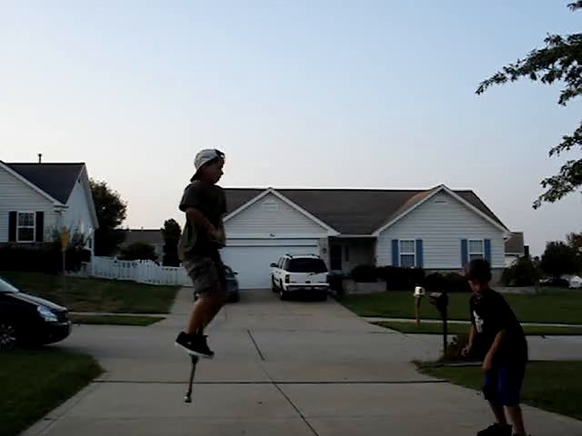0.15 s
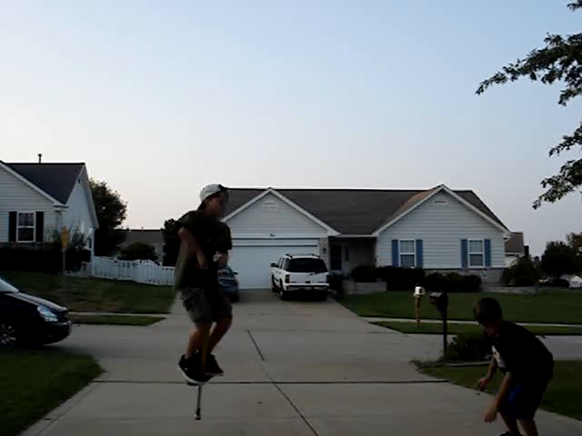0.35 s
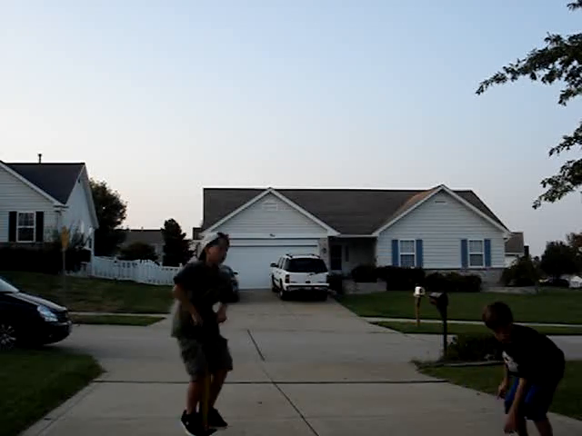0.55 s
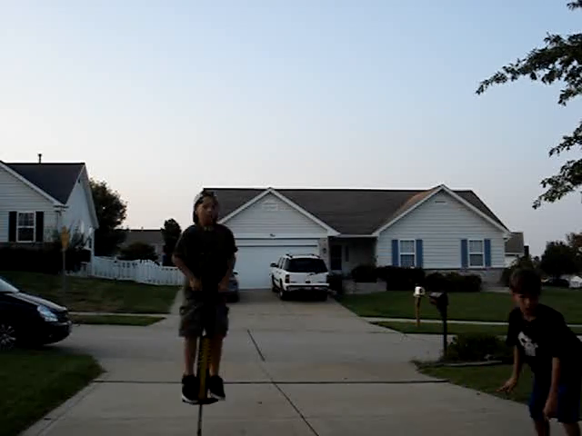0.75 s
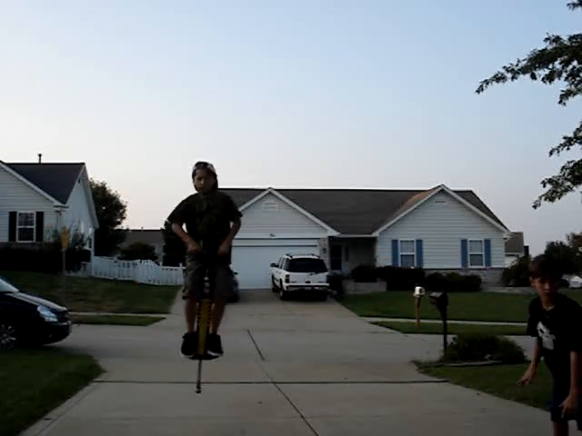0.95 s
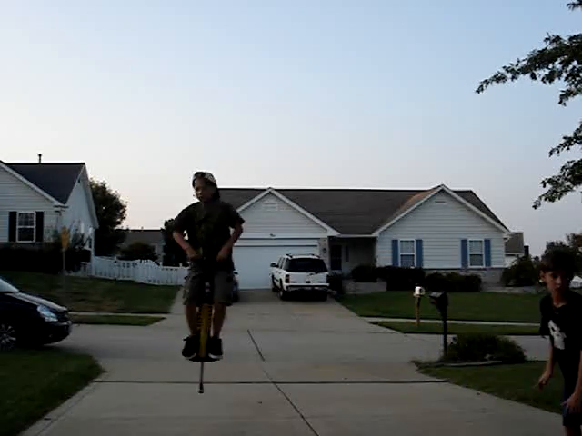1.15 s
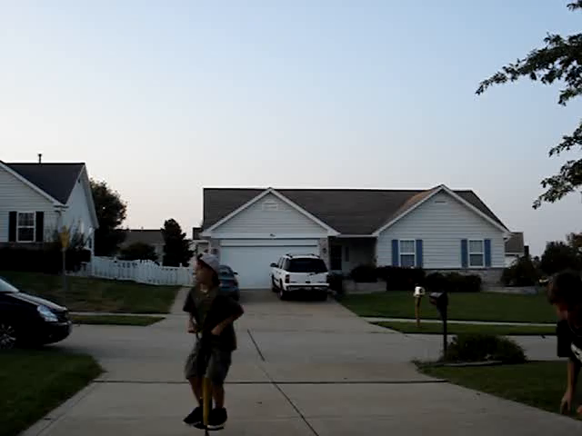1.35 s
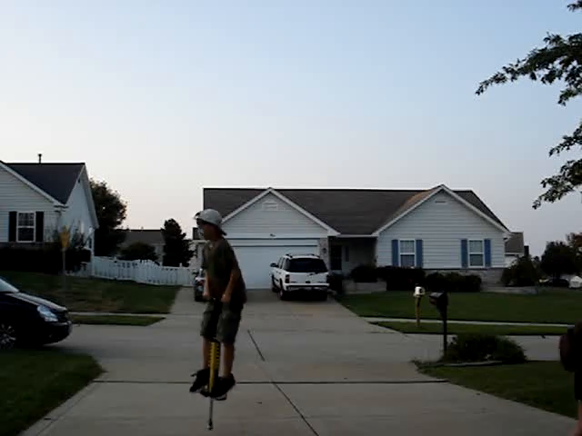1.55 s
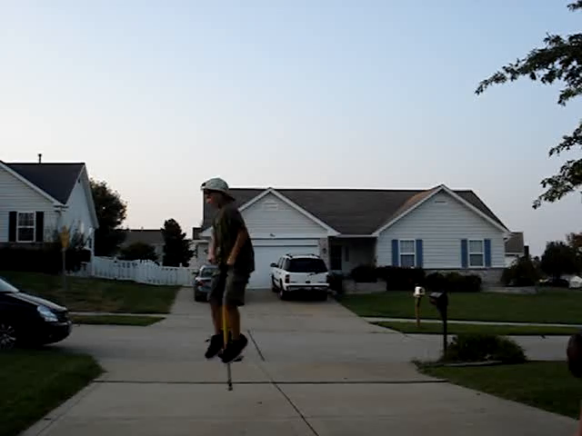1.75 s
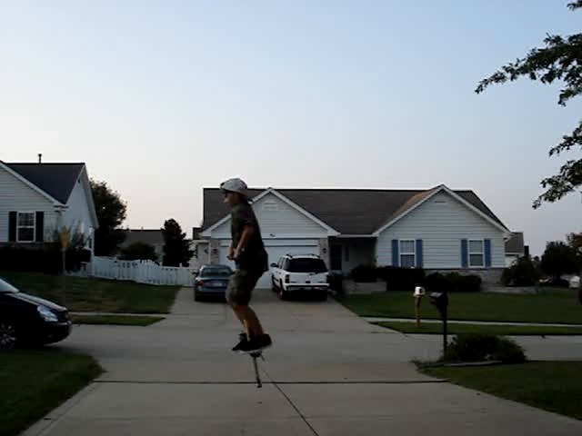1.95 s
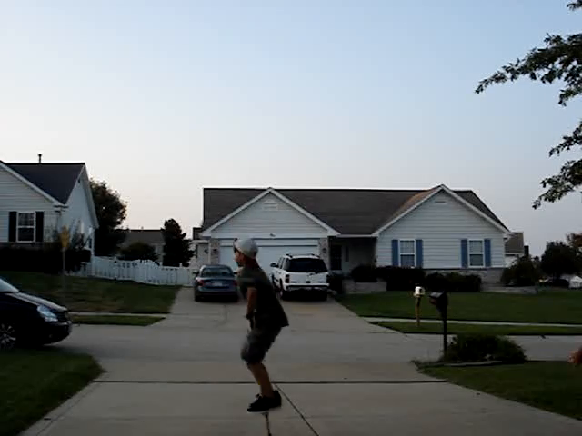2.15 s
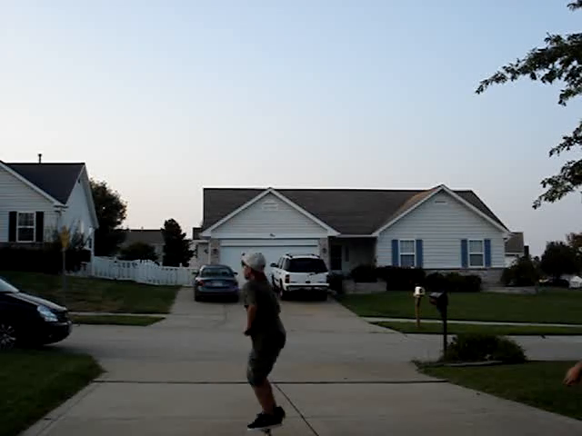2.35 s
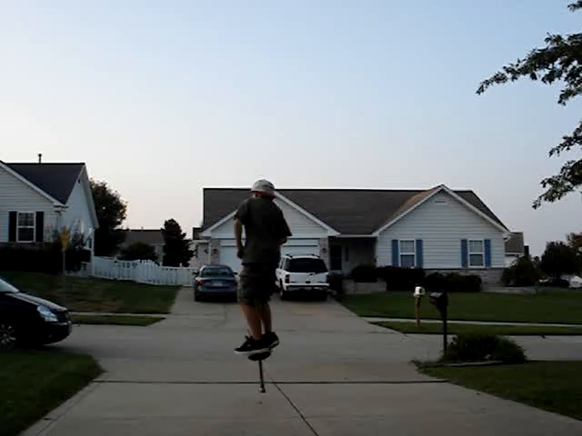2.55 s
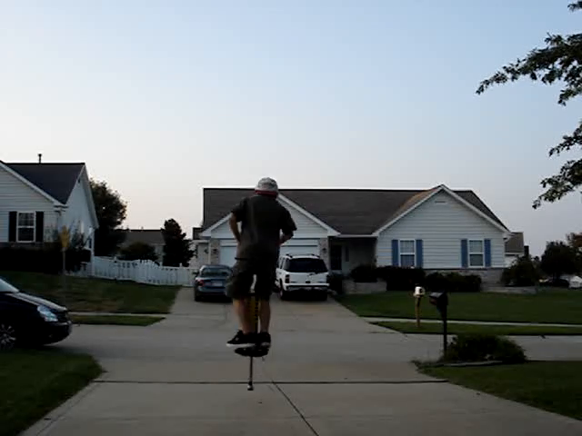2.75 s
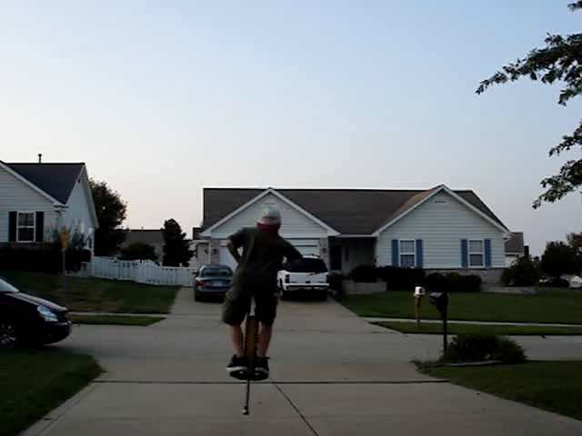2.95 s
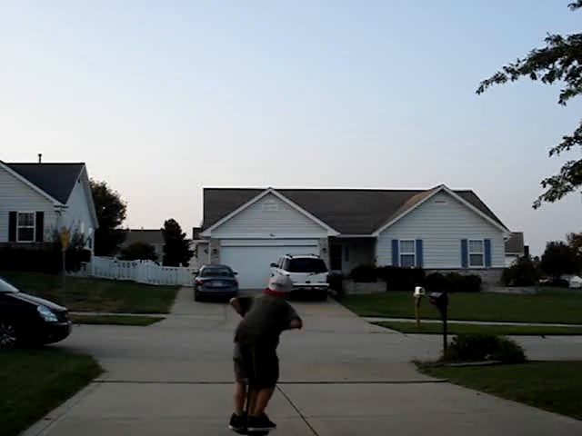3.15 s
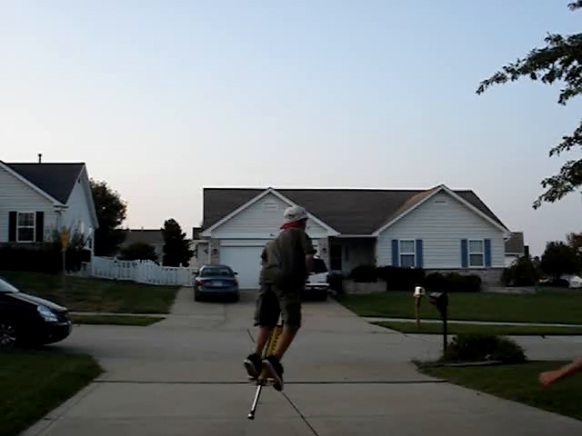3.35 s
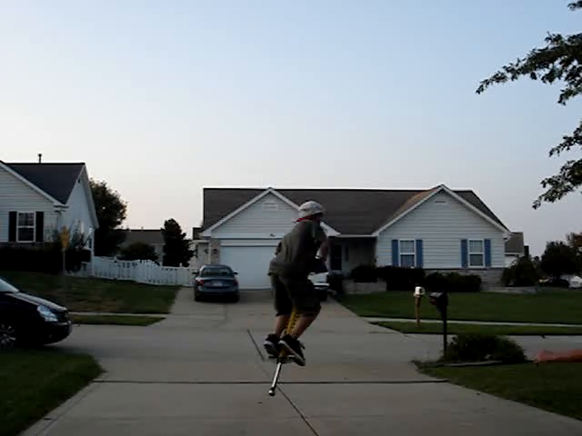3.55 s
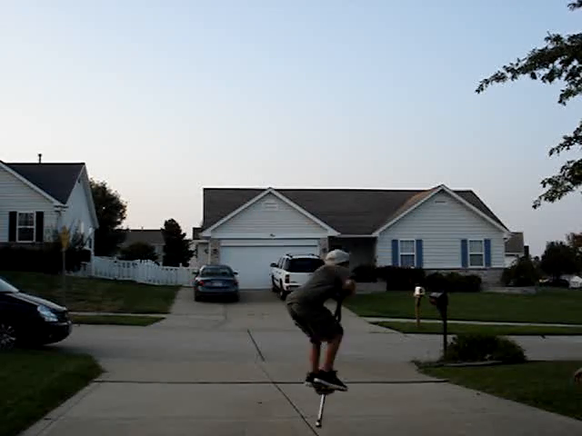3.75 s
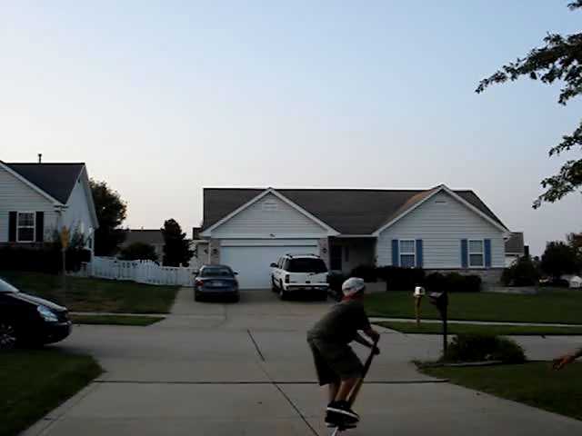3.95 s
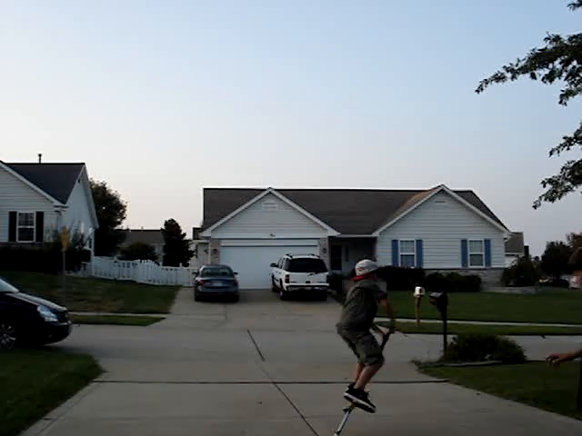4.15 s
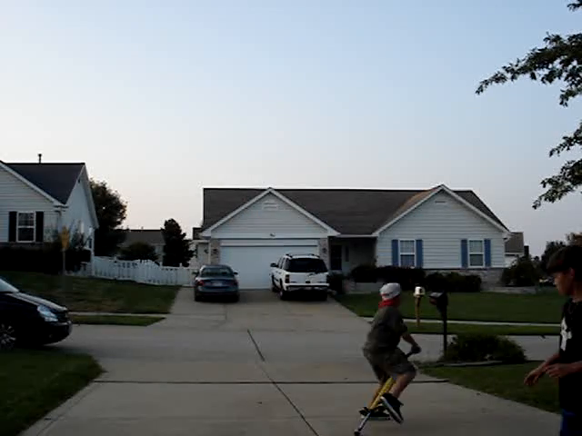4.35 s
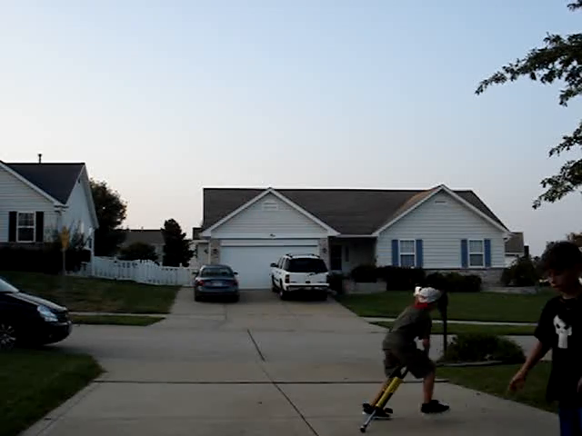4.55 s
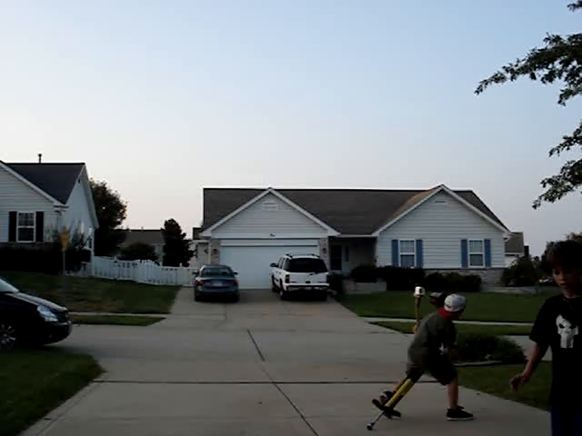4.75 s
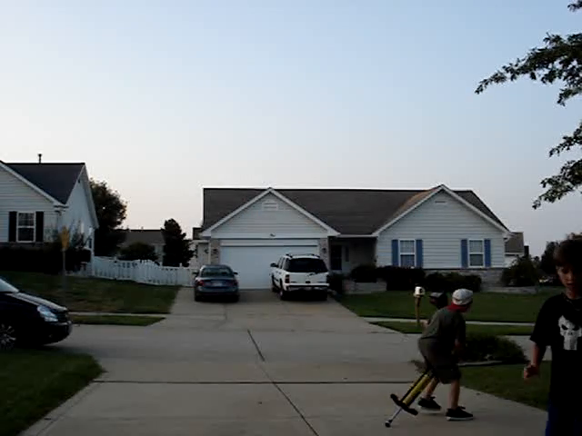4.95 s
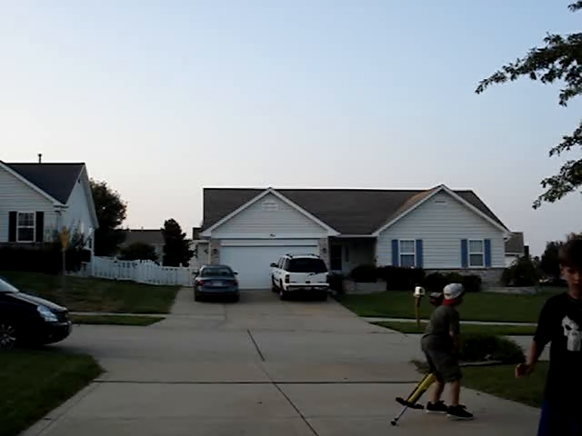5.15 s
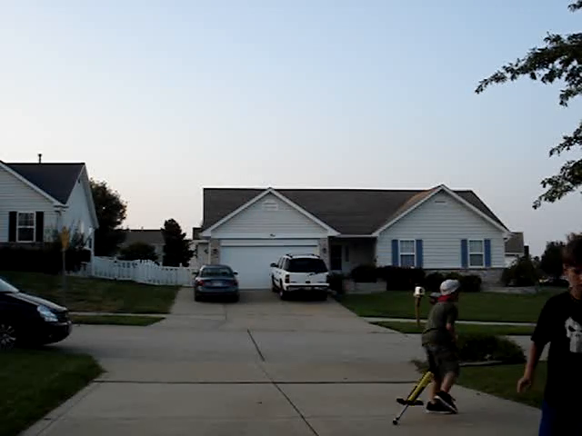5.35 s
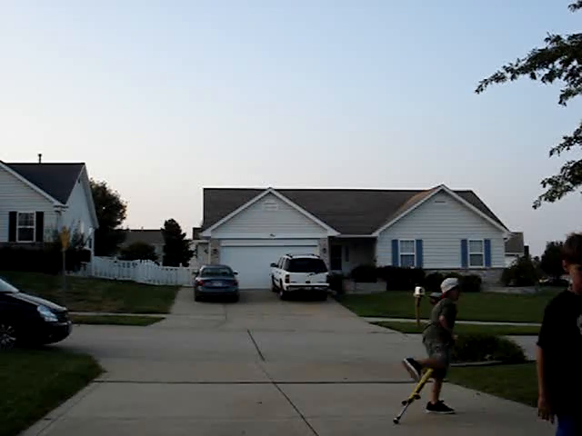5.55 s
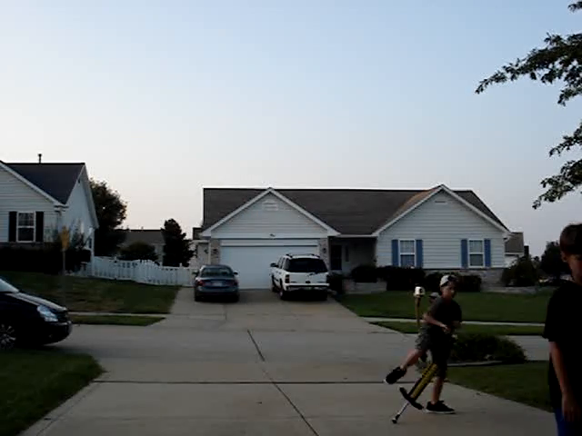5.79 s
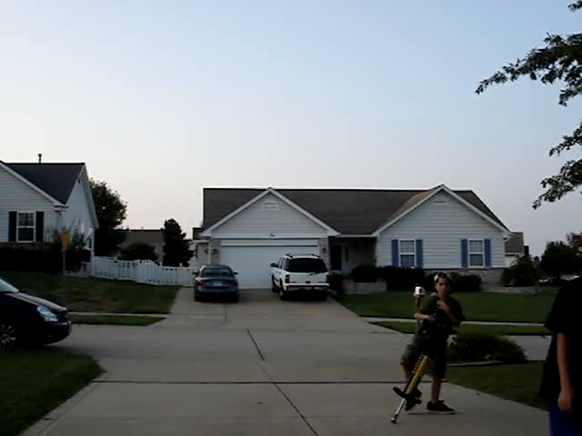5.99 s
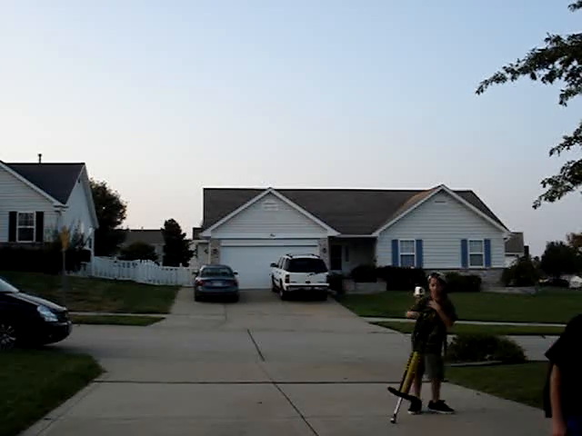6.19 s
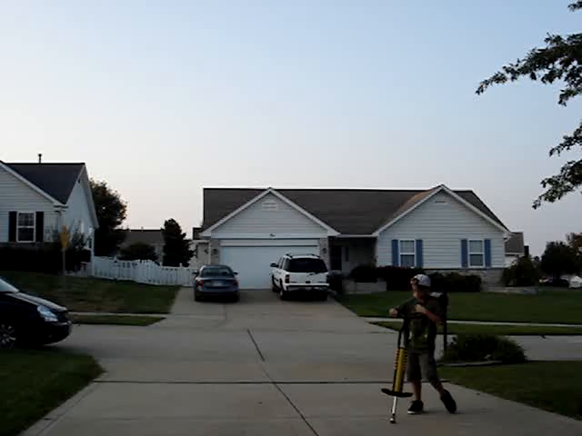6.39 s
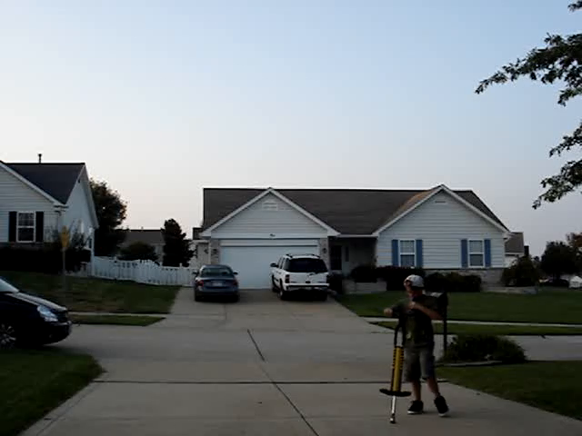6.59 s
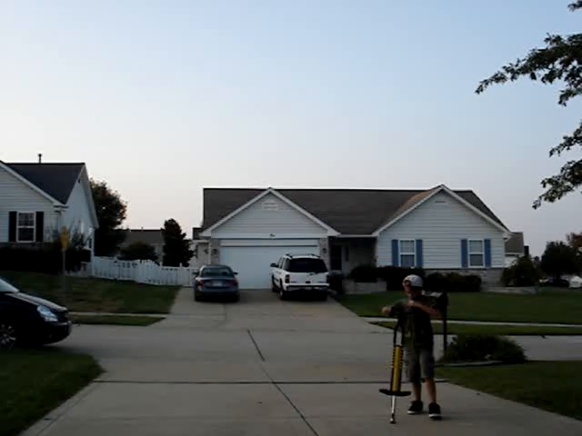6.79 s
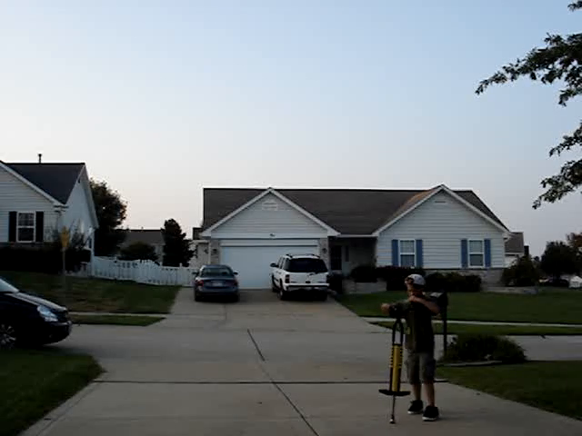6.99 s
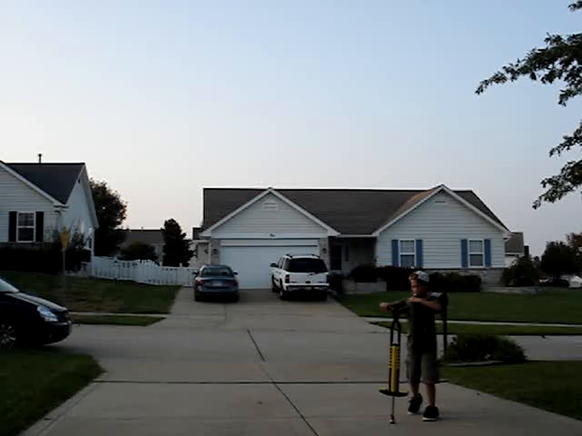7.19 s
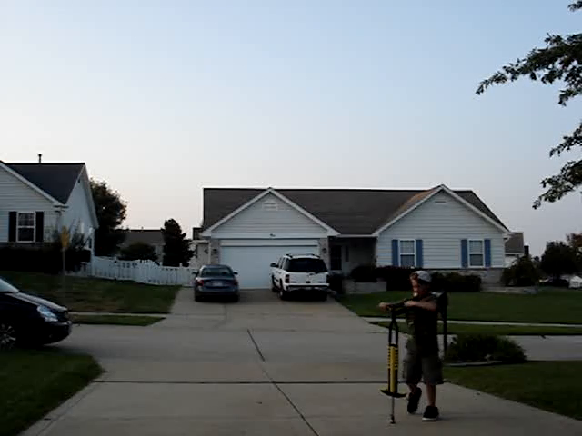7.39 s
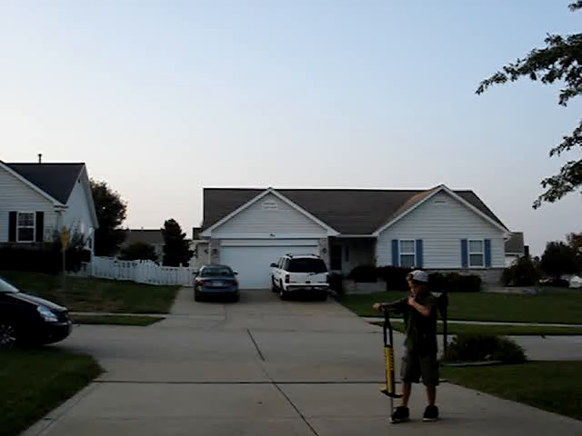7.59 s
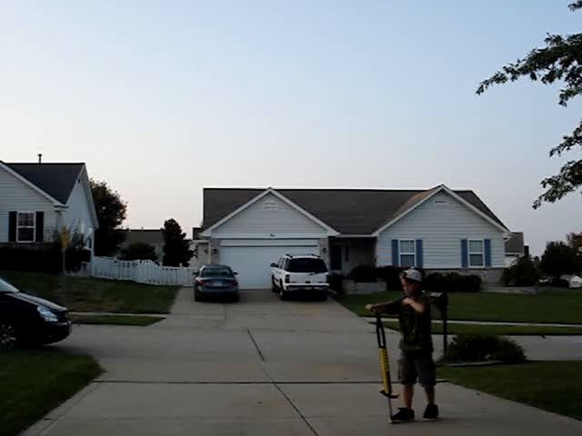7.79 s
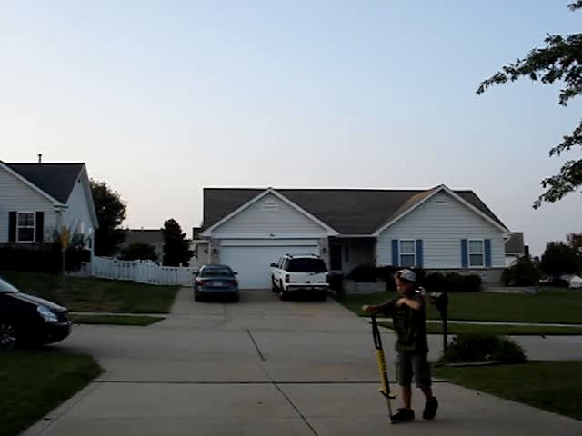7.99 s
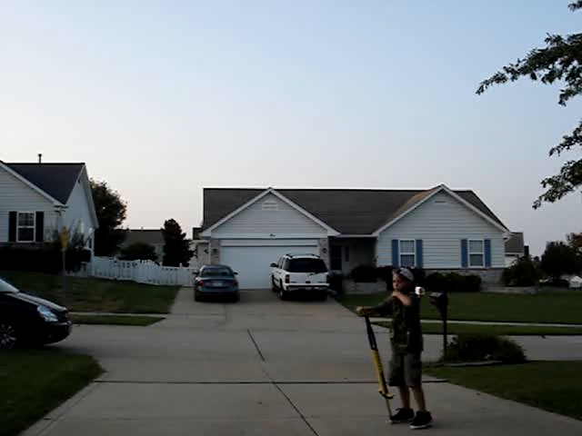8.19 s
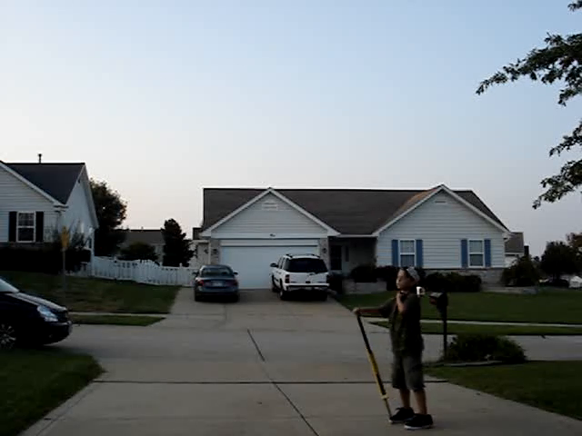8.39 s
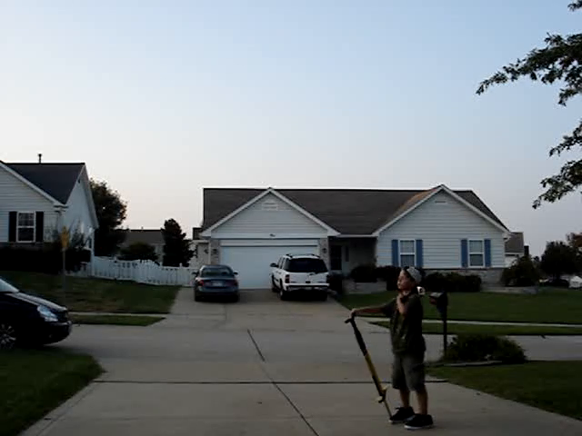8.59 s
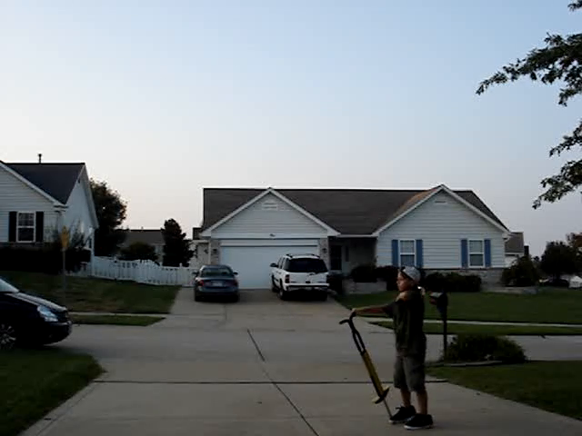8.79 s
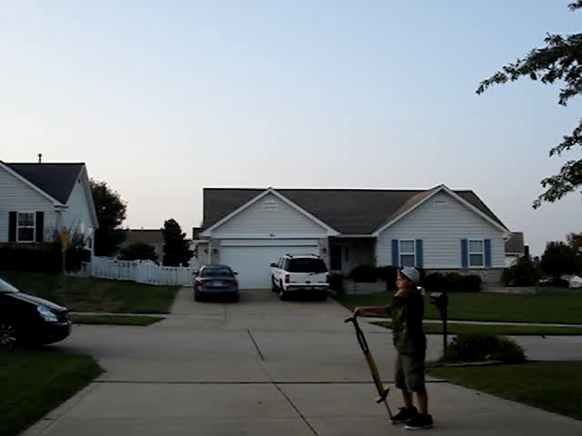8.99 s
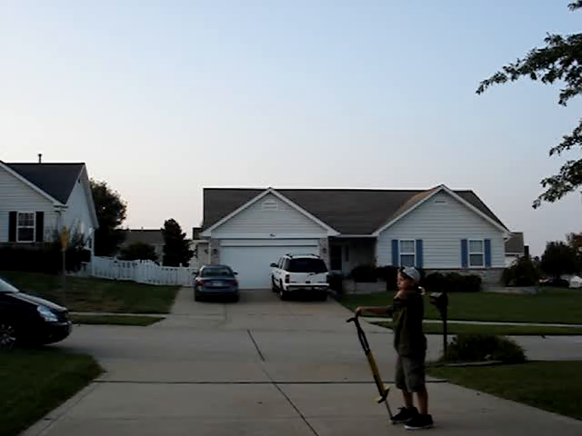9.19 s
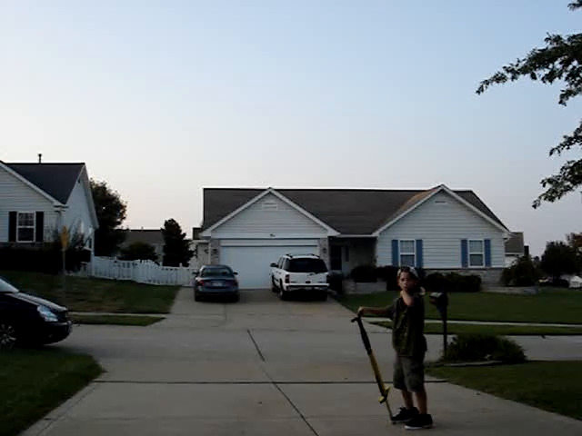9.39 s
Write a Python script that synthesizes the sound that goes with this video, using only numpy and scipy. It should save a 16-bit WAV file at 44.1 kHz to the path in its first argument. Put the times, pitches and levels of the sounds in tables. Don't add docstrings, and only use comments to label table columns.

```python
import sys
import numpy as np
from scipy import signal
from scipy.fft import rfft, irfft, next_fast_len
from scipy.io import wavfile
from scipy.ndimage import uniform_filter1d, map_coordinates

SR = 44100
rng = np.random.default_rng(int(sys.argv[2]) if len(sys.argv) > 2 else 0)


def makeup_ratio(level_db):
    decades = np.asarray(level_db, float) / 20
    return 10 ** decades


def dump(signal):
    limited = np.clip(np.atleast_2d(signal).T, -1, 1)
    pcm = np.round(limited * 32767).astype(np.int16)
    wavfile.write(sys.argv[1], SR, pcm)


N = 415863


def unit(x):
    return x / np.sqrt(np.mean(x ** 2) + 1e-20)


def curves(rows):
    s, *columns = np.transpose(rows)
    return [np.interp(np.arange(N) / SR, s, column) for column in columns]


def wobble(rate):
    at = np.arange(0, N, 12)
    knots = rng.standard_normal(int(N * rate / SR) + 4)
    return np.interp(np.arange(N), at, map_coordinates(knots, [at * rate / SR]))


def filtered(x, response):
    m = next_fast_len(N + SR // 2)
    return irfft(rfft(x, m) * response(np.fft.rfftfreq(m, 1 / SR)), m)[..., :N]


def coloured(spectrum):
    f, db = np.transpose(spectrum)

    def response(hz):
        return makeup_ratio(np.interp(np.log(hz + 1), np.log(f + 1), db))

    return unit(filtered(rng.standard_normal(N), response))


def lines(rows):
    t = np.arange(N) / SR
    out = np.zeros(N)
    for hz, db, width in rows:
        wander = np.cumsum(width * wobble(30 + 3 * width)) / SR
        out += makeup_ratio(db - 0.5) * np.sin(2 * np.pi * (hz * t + wander))
    return out


# frequency in Hz, density in dB per Hz.
STREET_SPECTRUM = [(15, -64), (25, -15), (69, -25), (96, -6.5), (169, -10), (206, -3.5), (403, -9),
                   (741, -4), (809, -3.5), (941, -7.5), (1810, -11.5), (1930, -10.5), (4500, -44),
                   (5850, -56), (9900, -120)]
# frequency in Hz, density in dB per Hz.
HISS_SPECTRUM = [(1470, -11.5), (2500, -6), (3430, -6), (3880, -7.5), (6820, -13), (8150, -12),
                 (10200, -18.5), (10300, -33), (13400, -67), (22000, -120)]
# frequency in Hz, level in dB re hum, line width in Hz.
HUM_LINES = [
    (103.3, 0.5, 1.1),
    (205, 1, 1.5),
    (297, -0.5, 5.7),
]
# frequency in Hz, level in dB, line width in Hz.
WHINE_LINES = [
    (1976, -60, 8),
    (7865, -65, 12),
    (7865, -63, 130),
]
# time in seconds, hum level in dB, street level in dB.
SWELL = [(0, -63, -39), (.55, -63, -35), (1.05, -62.5, -42.5), (2.05, -64.5, -41.5), (2.75, -70, -47),
         (3.1, -59, -46), (3.8, -60.5, -43.5), (4.7, -59.5, -40), (5.4, -54, -39), (6.1, -58, -34.5),
         (7.2, -50.5, -34), (7.8, -67, -45), (8.1, -54.5, -46.5), (8.7, -50, -36), (9.43, -51, -33.5)]


def background():
    hum_db, street_db = curves(SWELL)
    hiss_db = -50.3 + 0.093 * (street_db - street_db.mean())
    street = makeup_ratio(street_db - 8.0 + 0.56 * wobble(6)) * coloured(STREET_SPECTRUM)
    hum = makeup_ratio(hum_db + 1.8 * wobble(14)) * lines(HUM_LINES)
    hiss = makeup_ratio(hiss_db - 3.5) * coloured(HISS_SPECTRUM)
    whine = makeup_ratio(hiss_db + 52.0) * lines(WHINE_LINES)
    return street + hum + hiss + whine


# time in seconds, peak in dB.
THUMPS = [(0.604, -45), (0.818, -48), (1.432, -43), (1.645, -50), (2.185, -48), (2.397, -32), (3.903, -39),
          (5.558, -38.5), (7.237, -42), (7.271, -40), (7.58, -32.5), (7.873, -63)]


def thumps():
    push, t = np.zeros(N), np.arange(2000) / SR
    for s, db in THUMPS:
        push[round(s * SR)] = -makeup_ratio(db + 11.5)
    recoil = (1 - t / 0.0014) * np.exp(-t / 0.0028)
    return signal.fftconvolve(push, recoil)[:N]


# start in seconds, level in dB, frequency in Hz, width in Hz, hold in seconds.
RINGING_PARTS = [(.005, -42, 985, 150, 0.049), (.005, -37, 3150, 404, 0.065), (0.684, -35, 765, 125, 0.015),
                 (0.816, -35, 975, 104, 0.1), (1.119, -34, 1490, 316, 0.058),
                 (3.129, -35, 3530, 300, 0.025), (1.659, -41, 950, 150, 0.081),
                 (2.405, -27, 1600, 200, 0.047), (2.486, -41, 780, 119, 0.11),
                 (3.359, -39, 1060, 350, 0.069), (3.909, -27, 3680, 301, 0.035),
                 (4.677, -41, 766, 90, 0.028), (5.565, -27.5, 1760, 107.6, 0.072),
                 (5.576, -25.5, 1050, 50.3, 0.009), (6.344, -38, 1120, 200, 0.017),
                 (8.223, -41, 1860, 496, 0.0088), (8.44, -37, 1340, 397, 0.019),
                 (7.585, -19, 2250, 700, 0.05), (7.445, -34, 600, 150, 0.06), (7.51, -26, 620, 150, 0.015),
                 (7.583, -18, 600, 104, 0.0088), (7.873, -22.5, 1514, 57.3, 0.041),
                 (7.889, -21, 1766, 120, 0.046), (7.872, -21, 600, 61.6, 0.011),
                 (9.085, -47, 616, 200, 0.035), (0.605, -31, 3650, 350, 0.045),
                 (1.44, -31, 3600, 250, 0.02), (4.118, -36, 3600, 250, 0.03), (0.79, -38, 1850, 300, 0.025),
                 (2.1, -49, 2000, 250, 0.045), (3.004, -46, 1800, 300, 0.05), (2.945, -48, 1850, 300, 0.02),
                 (6.91, -32, 700, 200, 0.02), (5.59, -27, 1000, 200, 0.03), (5.635, -32, 1400, 500, 0.017),
                 (8.83, -35, 2400, 700, 0.02)]
# start in seconds, level in dB, frequency in Hz, width in Hz.
PINGING_PARTS = [(2.082, -38, 1900, 200), (2.07, -48, 3000, 400), (2.19, -37, 1150, 116),
                 (2.288, -23.5, 4030, 405), (2.866, -40, 2000, 250), (2.876, -43, 1800, 200),
                 (3.21, -33.5, 2080, 600), (4.18, -47, 3350, 120), (4.218, -42, 3430, 120),
                 (4.264, -40.5, 3470, 160), (5.131, -38, 496, 148), (4.772, -27.5, 423, 350),
                 (6.808, -30, 300, 150), (6.834, -26, 600, 200), (1.116, -35, 230, 120),
                 (0.682, -33, 200, 120), (6.802, -29, 456, 300), (7.242, -16.5, 660, 151.6),
                 (9.096, -32.5, 780, 158), (5.708, -33, 1765, 120), (8.219, -35, 2250, 250),
                 (8.247, -34, 1650, 200), (8.434, -37, 600, 200), (1.164, -35, 1450, 200),
                 (1.647, -30, 7200, 400), (4.437, -36, 1150, 300), (6.748, -34, 1250, 250),
                 (6.773, -28, 700, 200), (5.772, -36, 2600, 300)]


def rings():
    out, t = np.zeros(N + SR), np.arange(SR // 2) / SR
    ring_t60_s, ping_t60_s, ping_hold_s = 0.34, 0.095, 0.0079
    parts = [(*row, ring_t60_s) for row in RINGING_PARTS]
    parts += [(*row, ping_hold_s, ping_t60_s) for row in PINGING_PARTS]
    for s, db, hz, width, hold, t60 in parts:
        unevenness_db = 1.5 * map_coordinates(rng.standard_normal(100), [t * 150])
        rattle = rng.standard_normal(len(t)) * makeup_ratio(unevenness_db)
        peak = signal.iirpeak(hz, hz / max(1.5 * width, 60), SR)
        tone = unit(signal.lfilter(*peak, signal.lfilter(*peak, rattle)))
        decay = makeup_ratio(db - 60 * np.maximum(t - hold, 0) / t60)
        onset = 1 - np.exp(-t / 0.0013)
        out[round(s * SR):][:len(t)] += tone * decay * onset
    return out[:N]


def ringing(force, modes):
    def body(f):
        total = 0
        for k, (centre, width, db) in enumerate(modes):
            damping = 1j * f * width
            total = total + (-1) ** k * makeup_ratio(db) * damping / (centre ** 2 - f ** 2 + damping)
        return total

    gain = np.sqrt(np.mean(abs(body(np.linspace(0, SR / 2, num=2000))) ** 2))
    return filtered(force, body) / gain


# frequency in Hz, width in Hz, level in dB.
LOW_BODY = [(302, 183, -3.5), (600, 336, 3.5), (780, 407, 0)]
# frequency in Hz, width in Hz, level in dB.
TUBE = [(1150, 780, -1.5), (1600, 296, 6), (1950, 790, -0.5)]
# frequency in Hz, width in Hz, level in dB.
STEEL = [(2820, 2600, -6), (4700, 1770, 0.5), (6800, 3300, -2.5), (8850, 2800, -4.5)]
# frequency in Hz, width in Hz, level in dB.
COIL = [(3570, 420, 0), (7200, 200, -11)]


def bodies(low, tube, steel, grain_db, coil=0, blows=0):
    bunching = makeup_ratio(grain_db * (wobble(1300) + 0.6 * wobble(350)))
    force = blows + unit(rng.standard_normal((3, N)) * bunching)

    def dulling(f):
        return 1 / (1 + 1.2j * f / 2650 - (f / 2650) ** 2) ** 0.98

    dull = ringing(low * force[0], LOW_BODY) + ringing(tube * force[0], TUBE)
    bright = ringing(steel * force[1], STEEL) + ringing(coil * force[2], COIL)
    return filtered(dull, dulling) + bright


def struck(rows, shape, fade, grain_db, coil_db, blow_db):
    power, blows, t = np.zeros((4, N + SR)), np.zeros(N), np.arange(SR // 2) / SR
    for s, db, low_db, steel_db, t60, extra in rows:
        at = round(s * SR)
        blows[at + 40:at + 46] = -makeup_ratio(blow_db) * np.hanning(6)
        for k, rel_db in enumerate([low_db, 0, steel_db, steel_db + coil_db]):
            envelope = makeup_ratio(db + rel_db) * shape(t, t60 * fade[k], extra)
            power[k, at:at + len(t)] += envelope ** 2
    low, tube, steel, coil = np.sqrt(power[:, :N])
    return bodies(low, tube, steel, grain_db, coil, blows)


# start in seconds, length in seconds, level in dB, low body in dB.
STROKES = [(4.69, 0.12, -46.5, 7), (4.812, 0.12, -41, -3), (5.728, 0.054, -50, 11),
           (5.967, 0.17, -34.5, -6), (6.156, 0.25, -37.5, -2), (6.476, 0.076, -49, -3),
           (6.57, 0.16, -40.5, -9), (6.855, 0.06, -30, -2), (6.985, 0.085, -49.5, 5), (7.37, 0.15, -43, 11),
           (7.45, 0.13, -42, 8), (7.705, 0.11, -35, -1.5), (8.052, .17, -42, 4), (8.25, 0.035, -40.5, 5),
           (8.315, 0.066, -43.5, 4), (8.49, 0.28, -57.5, 14), (9.117, 0.22, -54, 18)]


def scuffs():
    t, level, low = np.arange(N) / SR, 0, 0
    rise_s, fall_s, grit_db = 0.037, 0.049, -11.5
    for s, length, db, low_db in STROKES:
        rise = (t - s) / rise_s
        fall = 1 - (t - s - length) / fall_s
        stroke = makeup_ratio(db - 5.5) * np.clip(np.minimum(rise, fall), 0, 1)
        level = level + stroke
        low = low + stroke * makeup_ratio(low_db)
    drag = makeup_ratio(2 * wobble(25) + 2.5 * np.clip(wobble(70), 0, 1.5))
    return bodies(low * drag, level * drag, level * drag * makeup_ratio(grit_db), grain_db=2.0)


# start in seconds, peak in dB, low body in dB, steel in dB, decay T60 in seconds.
KNOCKS = [(0.214, -37, -24, 4.5, 0.05), (0.68, -15, 0, -2, 0.38), (1.1145, -14, -1, -10, 0.17),
          (1.188, -28.5, -0.5, -29, 0.55), (2.4443, -31, -22, -17, 0.32), (2.866, -36, -10, -22, 0.41),
          (2.9418, -31.5, -22, -15, 0.39), (4.3479, -15.5, -8, -13.5, 0.27), (4.723, -32, 8, -31, 0.25),
          (4.774, -13.5, -1, -25, 0.18), (5.1282, -46.5, 18.5, -8, 0.15), (6.0075, -24, -14, -7, 0.12),
          (6.109, -32.5, -6, -2, 0.18), (6.4506, -25, -7, -13, 0.29), (6.5535, -20, -10, -14, 0.2),
          (6.7486, -25, -14, -12.5, 0.32), (6.8035, -19, 3, -18.5, 0.81), (6.83, -19, 0, -12.5, 0.56),
          (7.0223, -31, -1, -22, 0.12), (7.5825, -9, -2, -24, 0.54), (7.875, -8, -2, -16.5, 0.25),
          (8.8165, -12.5, -4, -25, 0.3), (9.093, -25.5, 6.5, -37, 0.31)]
# start in seconds, peak in dB, low body in dB, steel in dB, decay T60 in seconds.
SLAPS = [(2.0825, -38, -18, -22, 0.45), (2.169, -32.5, 5.5, 0, 0.18), (2.184, -9, -12, -16.5, 0.38),
         (2.3995, -10, -6, -4, 0.27), (2.411, -13, -14, -18.5, 0.51), (2.431, -27.5, 13.5, 8.5, 0.25),
         (3.0005, -33, -3.5, -16, 0.34), (3.3065, -28.5, -2, -3, 0.46), (4.4057, -29.5, 3.5, -3, 0.25),
         (4.807, -29, 2.5, -7.5, 0.35), (5.556, -8, -7.5, -8, 0.25), (5.708, -31, -21, -11, 0.15),
         (6.296, -33, -3, -20, 0.51), (6.6656, -26, -5, -19, 0.26), (6.7219, -26, -3, -41, 0.24),
         (6.771, -21, -2.5, -16.5, 0.54), (7.2383, -12, 2, -10.5, 0.41), (7.272, -13, -1, -17, 0.26),
         (7.317, -23, -7, -10.5, 0.39), (7.5097, -15.5, -1, -18, 0.26), (7.9106, -10, -6, -12.5, 0.4),
         (8.2175, -24, -3.5, -41, 0.31), (8.433, -28, 4.5, -13, 0.17)]


def slaps():
    def shape(t, t60, wash_db):
        crack = makeup_ratio(-7.5 - 60 * t / 0.025)
        wash = makeup_ratio(wash_db - 60 * t / t60) * (1 - np.exp(-t / 0.0092))
        return crack + wash

    knock_wash_db, slap_wash_db = -12.5, -9
    rows = [(*row, knock_wash_db) for row in KNOCKS] + [(*row, slap_wash_db) for row in SLAPS]
    return struck(rows, shape, fade=[0.86, 0.95, 0.69, 0.3], grain_db=1.0, coil_db=-36, blow_db=8.5)


# time in seconds, peak in dB, frequency in Hz.
CLICKS = [(.2148, -25, 4500), (.6024, -12, 700), (.6124, -9, 3600), (.6293, -10, 3600), (.6807, -5, 1100),
          (.6848, -6, 1000), (.8218, -13, 3900), (.8345, -13, 3000), (1.1158, -10, 1100),
          (1.1181, -5, 1000), (1.1196, -7, 1300), (1.1897, -16, 1500), (1.434, -11, 2900),
          (1.4475, -10, 3600), (1.4585, -9, 3600), (1.6463, -8, 4000), (1.647, -6, 2000),
          (2.1705, -20, 1000), (2.1851, -6, 2300), (2.2845, -10, 3200), (2.2884, -9, 3200), (2.399, 1, 900),
          (2.413, -7, 1300), (2.4174, -1, 1100), (2.4293, -4, 900), (2.4313, -4, 800), (2.443, -5, 1300),
          (2.4904, -5, 2800), (2.8678, -24, 2000), (2.9433, -26, 1800), (3.0038, -27, 700),
          (3.1294, -9, 3900), (3.139, -9, 3600), (3.3537, -14, 5500), (3.9061, -7, 3750),
          (4.1061, -13, 4800), (4.3476, -5, 1400), (4.4385, -22, 1250), (4.7252, -22, 600),
          (4.7492, -23, 550), (4.7758, -10, 1100), (4.7775, -8, 1300), (5.5638, -6, 1200),
          (6.5535, -12, 1700), (6.7714, -10, 1500), (6.8036, -5, 900), (6.8044, 0, 550), (6.8388, -9, 650),
          (7.2415, -4, 700), (7.5829, -1, 1000), (7.8757, -2, 800), (8.218, -14, 1100), (8.4337, -17, 900),
          (8.8168, -13, 1700), (8.8225, -6, 2200), (9.1006, -12, 800)]


def clicks():
    out, t = np.zeros(N), np.arange(400) / SR
    for s, db, hz in CLICKS:
        swing = np.sin(2 * np.pi * hz * t) * np.exp(-t * hz * 1.7)
        out[round(s * SR):][:len(t)] -= makeup_ratio(db + 0.3) * swing
    return filtered(out, lambda f: (1j * f / (300 + 1j * f)) ** 2)


# start in seconds, peak in dB, low body in dB, steel in dB, hold in seconds.
CLATTER = [(0.0024, -22.5, -5.5, 3.5, 0.0039), (0.6, -22.5, -2, 6.5, 0.031), (0.8198, -26, -6, 5.5, 0.04),
           (1.4314, -24, -1.5, 3, 0.02), (1.444, -26, -6, 5, 0.016), (1.512, -36, -8, 5, 0.006),
           (1.54, -50, -12, 2, 0.12), (1.6455, -25, -7, 2.5, 0.023), (1.693, -35, -22, 8, 0.02),
           (2.282, -22.5, -3, 2, 0.052), (2.4895, -22, -16, -1, 0.011), (3.1275, -20, -1, 4, 0.0088),
           (3.163, -31, 0, -19, 0.028), (3.3525, -25, -15, 2, 0.024), (3.38, -34, -4.5, -24, 0.11),
           (3.902, -25, 0.5, 7.5, 0.03), (4.104, -32, -8, 6.5, 0.004), (4.12, -29, -10, 5.5, 0.008),
           (4.448, -22.5, -7, 1, 0.0098), (4.498, -40, -3, -5, 0.015), (5.6, -22, -2.5, -6, 0.015),
           (5.761, -27.5, -14, -6, 0.012), (7.74, -29.5, -6, 3.5, 0.02), (8.323, -36, -17, -8, 0.035)]


def spring():
    def shape(t, t60, hold):
        decay = makeup_ratio(-11 - 60 * np.maximum(t - hold, 0) / t60)
        return decay * (1 - 0.25 * np.exp(-t / 0.0017))

    t60_s = 0.33
    rows = [(s, db, low_db, steel_db, t60_s, hold) for s, db, low_db, steel_db, hold in CLATTER]
    return struck(rows, shape, fade=[0.89, 1.6, 1.07, 1.42], grain_db=2.0, coil_db=-1.5, blow_db=-11)


def scene():
    mono = spring() + slaps() + clicks() + rings() + scuffs() + thumps() + background()
    return np.tile(mono, (2, 1))


def starved(z, hz, margin_db, chance_db, mask_db, from_hz):
    rows, cols = np.arange(z.shape[0]) // 2, np.arange(z.shape[1]) // 6
    by_band = np.add.reduceat(abs(z) ** 2, np.arange(0, len(rows), 2), axis=0)
    cell = np.add.reduceat(by_band, np.arange(0, len(cols), 6), axis=1)
    nearby = uniform_filter1d(cell, size=3, axis=1) + makeup_ratio(2 * mask_db) * cell.sum(axis=0)
    luck = chance_db * (rng.standard_normal(cell.shape) + 0.7 * rng.standard_normal(cell.shape[1]))
    weak = cell < nearby * makeup_ratio(2 * (margin_db + luck))
    return 1 - 0.99 * (weak[rows][:, cols] & (hz[:, None] > from_hz))


# end in seconds, length in seconds, lowest frequency in Hz.
GAPS = [(0.205, .012, 7000), (0.601, 0.0099, 2600), (.818, 0.014, 3700), (1.112, 0.019, 700),
        (1.433, 0.014, 3000), (1.644, 0.012, 4700), (2.165, 0.02, 5500), (2.174, 0.0051, 5000),
        (2.4, .01, 5300), (3.124, 0.014, 1800), (3.35, 0.025, 4200), (4.105, 0.0045, 4500),
        (4.345, 0.013, 1300), (4.77, 0.0049, 2500), (5.55, 0.025, 6800), (6.545, 0.0071, 4000),
        (7.229, 0.014, 1900), (7.509, 0.006, 3000), (7.58, 0.0054, 2400), (7.871, .012, 3600),
        (8.813, 0.0091, 3000)]


def drop_treble(z, hz, t):
    for end, length, low_hz in GAPS:
        z[hz > low_hz - 400] *= 1 - 0.999 * ((t > end - length) & (t < end))
    return z


def band_limit(x):
    return signal.sosfilt(signal.butter(12, 10490, fs=SR, output="sos"), x)


def record(dry):
    overloaded = dry[0] / (1 + abs(dry[0] / 0.72) ** 8) ** (1 / 8)
    hz, t, z = signal.stft(overloaded, SR, nperseg=128)
    z *= starved(z, hz, margin_db=-4.6, chance_db=2.7, mask_db=-35, from_hz=4800)
    z = drop_treble(z, hz, t)
    x = signal.istft(z, SR, nperseg=128)[1][:N]
    x = filtered(x, lambda f: 1 / (1 + (f / 10150) ** 160))
    return band_limit(np.tile(x, (2, 1)))


dry = scene()
out = record(dry)
dump(out)
```